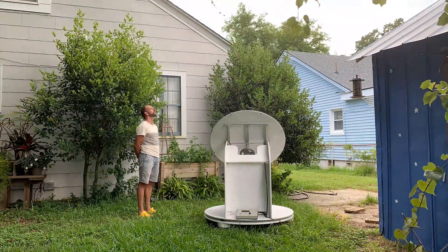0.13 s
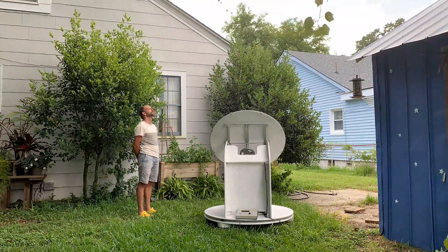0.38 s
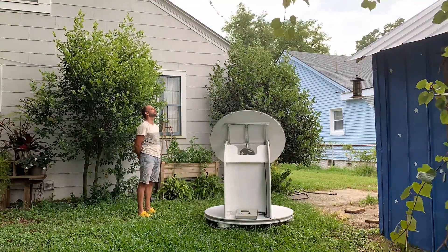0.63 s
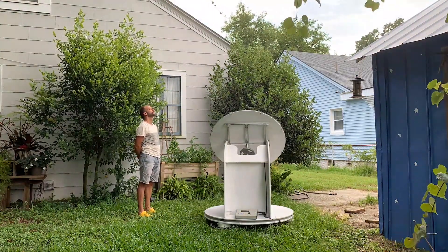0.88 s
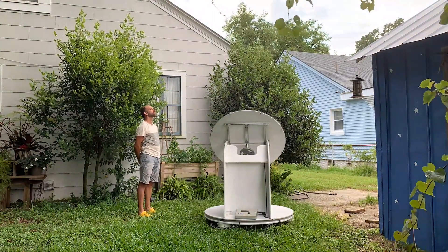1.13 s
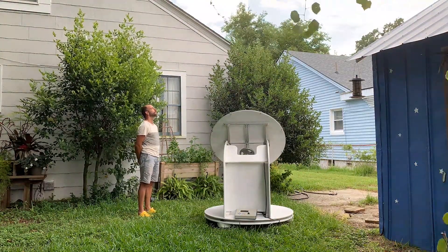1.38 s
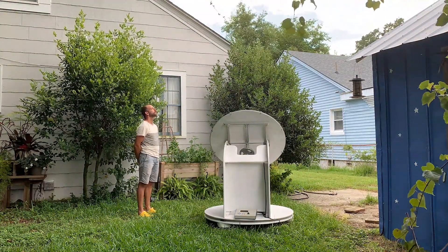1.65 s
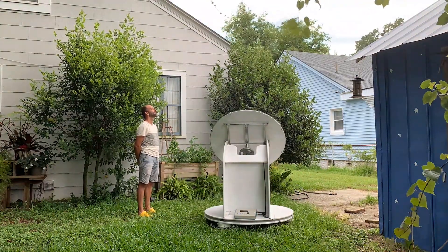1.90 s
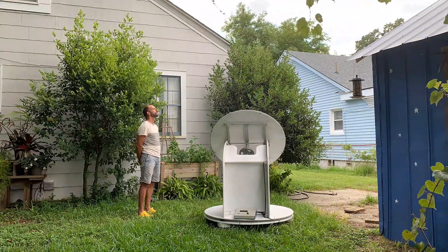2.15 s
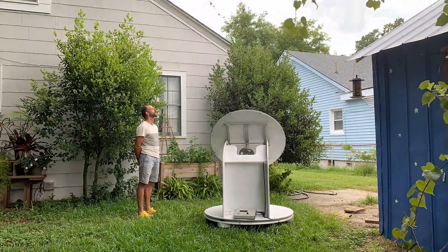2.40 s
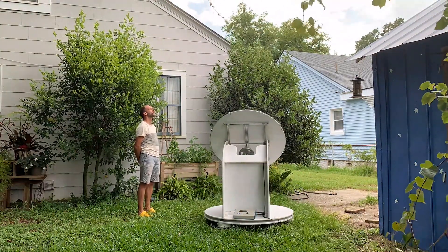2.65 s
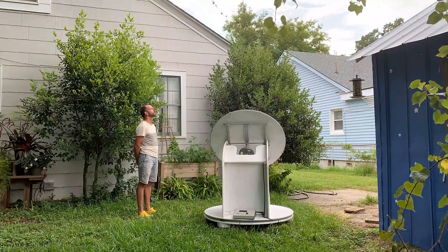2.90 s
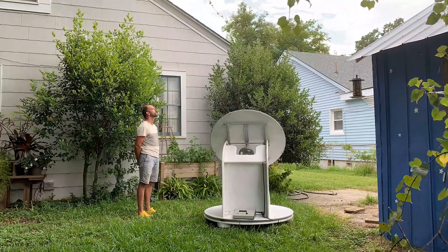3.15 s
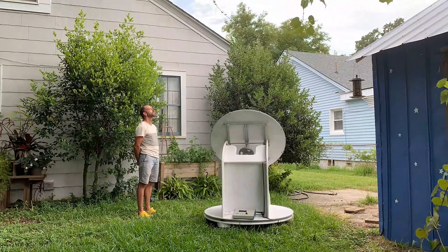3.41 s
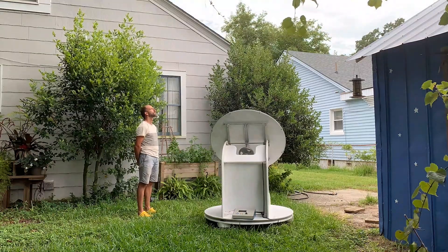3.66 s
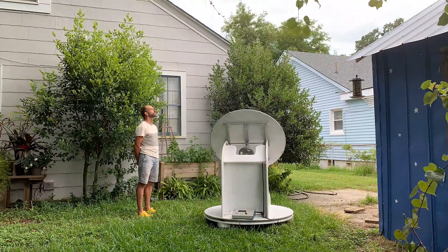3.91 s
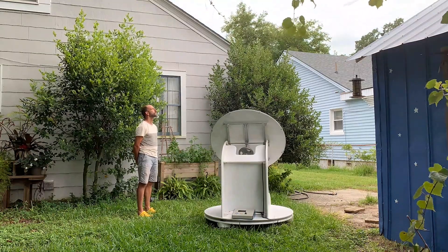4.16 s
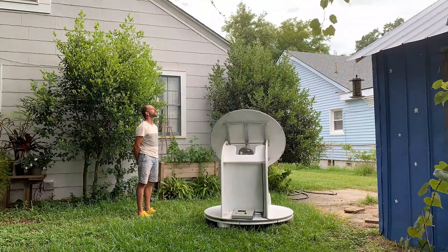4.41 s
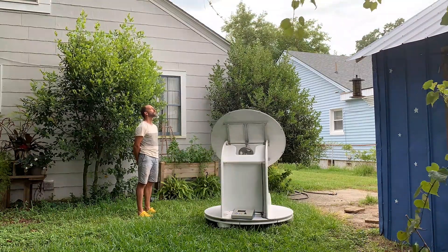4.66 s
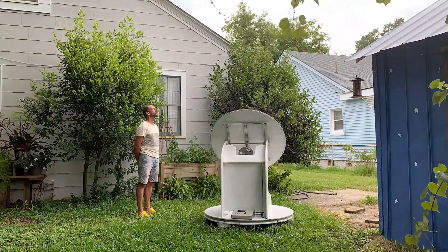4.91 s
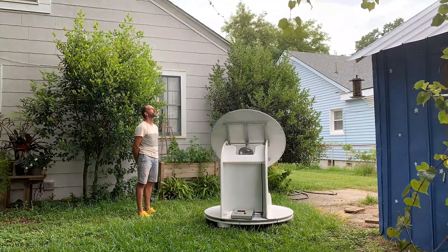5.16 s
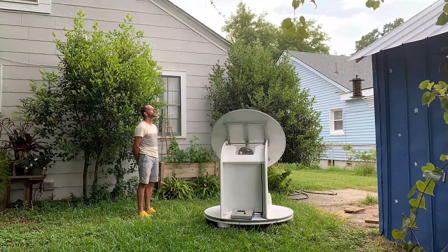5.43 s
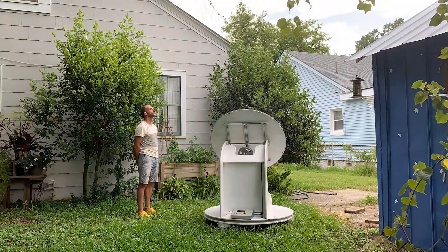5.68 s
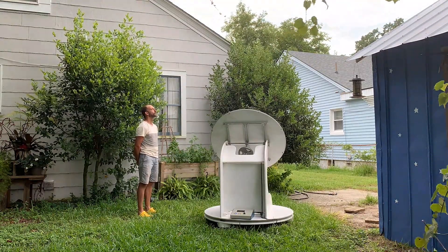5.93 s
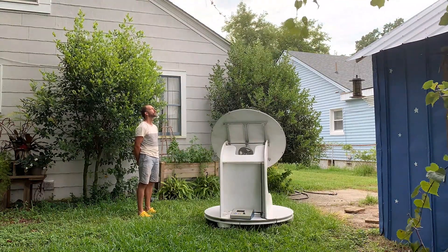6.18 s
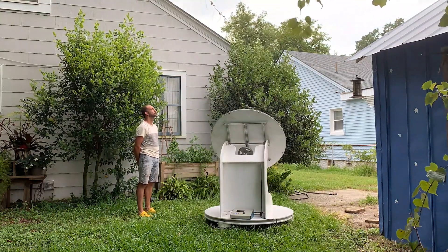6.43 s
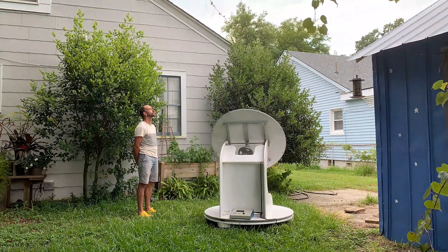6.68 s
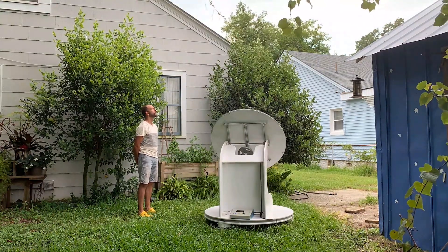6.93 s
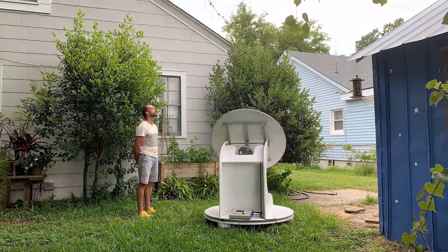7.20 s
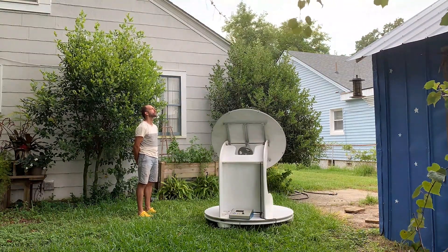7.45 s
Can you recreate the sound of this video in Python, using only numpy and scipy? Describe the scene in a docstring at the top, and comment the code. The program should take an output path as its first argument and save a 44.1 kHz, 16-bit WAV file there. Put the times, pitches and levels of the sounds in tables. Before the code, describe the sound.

Thin, piercing cricket song flutters over a quiet, low-heavy bed of mains hum, motors and far town noise. Wind bumps the open-air microphone during the first two seconds, with faint leaf rustle and a cluster of crisp ticks around one and a half seconds. Afterwards it is calmer, with only stray ticks, and the crickets grow slightly stronger. A tiny gap of silence comes just before the end, then a soft low swell. Mono.

```python
"""Ground crickets in a back garden

Two bands of crickets throb about five times a second, drifting in and out of step: sagging tones, one per wing stroke.
Compressors hum as wavering sines over the even roar of town and a faint hiss, both shaped noise.
A breeze lifts hiss and leaf rustle, ticks leaves as short noise bursts and buffets the microphone with low noise.
The sound drops out once, briefly; a swell of low noise closes the scene."""
import sys
import numpy as np
from scipy import signal
from scipy.fft import rfft, irfft, next_fast_len
from scipy.io import wavfile
from scipy.ndimage import uniform_filter1d

SR = 44100
rng = np.random.default_rng(int(sys.argv[2]) if len(sys.argv) > 2 else 0)


def master(y):
    """Save y as 16-bit WAV."""
    cut = np.clip(np.atleast_2d(y).T, -1, 1)
    pcm = np.round(cut * 32767)  # scale
    wavfile.write(sys.argv[1], SR, pcm.astype(np.int16))


def volts(x):
    """Linear amplitude factor 10**(x/20) for a level x in dB, scalar or array-like."""
    e = np.asarray(x, float) / 20
    return 10 ** e


N = 333837
LONG = next_fast_len(N)
T = np.arange(N) / SR


def curve(table):
    """Joins (time [s], value) points by straight lines."""
    return np.interp(T, *np.transpose(table))


def unit(x):
    """Scales a signal to rms 1."""
    return x / np.sqrt(np.mean(x ** 2))


def walk(rate):
    """Random levels, rate a second, joined smoothly; their spread is near 1."""
    hold = int(SR / rate)
    levels = rng.standard_normal(N // hold + 3)
    joined = np.interp(T * rate, np.arange(len(levels)), levels)
    return 1.2 * uniform_filter1d(joined, hold // 2)


def swells(times, peaks_db, lengths):
    """Summed power of raised-cosine swells, each as long as its length [s] from foot to foot."""
    power = np.zeros(N)
    for time, db, length in zip(times, peaks_db, lengths):
        first = max(int((time - length / 2) * SR), 0)
        span = slice(first, int((time + length / 2) * SR))
        power[span] += volts(db) ** 2 * np.cos(np.pi * (T[span] - time) / length) ** 2
    return power


def airy(colour, swell_db, flicker_db):
    """Coloured noise in half-octave bands that swell together and flicker each on its own."""
    octave = np.log2(np.arange(1, LONG // 2 + 2) * SR / LONG)
    hz, db = np.transpose(colour)
    density_db = np.interp(octave, np.log2(hz), db, left=-200, right=-200)
    gain = volts(density_db) * np.sqrt(SR / 2)  # from level per Hz to white noise gain
    noise = gain * rfft(rng.standard_normal(LONG))
    swell, out = walk(3.05), 0
    for centre in np.arange(np.floor(np.log2(hz[0])), np.log2(hz[-1]) + .5, .5):
        share = np.cos(np.pi * np.clip(octave - centre, -.5, .5)) ** 2
        band = irfft(noise * share, LONG)[:N]
        out = out + volts(swell_db * swell + flicker_db * walk(12)) * band
    return out


STROKES_PER_S, STROKE_SPREAD = 52, .08  # middle rate; spread between crickets, as a fraction of it
STROKE_SHARE, STROKE_SCATTER_DB = .75, 2.2  # sounding part of each stroke cycle; level spread


def group(hz, spread_hz, fall_hz, count=10):
    """Each cricket closes its wings at its own rate; every stroke is a short tone that sags in pitch."""
    tone, overtone = 0, 0
    for pace, start in rng.standard_normal((count, 2)):
        rate = STROKES_PER_S * (1 + STROKE_SPREAD * pace)
        strokes = T * rate + 10 * abs(start) + walk(5)  # running count, wandering in time
        part, stroke = strokes % 1 / STROKE_SHARE, strokes.astype(int)
        size, pitch = rng.standard_normal((N // 100, 2)).T
        swing = volts(STROKE_SCATTER_DB * size)[stroke] * np.sin(np.pi * np.minimum(part, 1)) ** 2
        wing_hz = hz + spread_hz * pitch[stroke] + fall_hz * (.5 - part)
        wing = np.sin(2 * np.pi * np.cumsum(wing_hz) / SR)
        tone = tone + swing * wing
        overtone = overtone + swing * (1 - 2 * wing ** 2)  # the octave above
    return unit(tone), unit(overtone)


# groups of crickets: (part of the song, wing pitch [Hz], pitch spread [Hz], fall during a stroke [Hz],
# relative level [dB], relative share of the overtone [dB])
CRICKET_GROUPS = [("lower", 7320, 79, 298, -0.5, 0), ("lower", 7080, 99, 347, -8.5, -8),
                  ("lower", 6720, 170, 400, -21.5, -14), ("higher", 7540, 45, 199, 1, -4),
                  ("higher", 7834, 60, 200, -15.5, -11)]
# swells of the far band: (time [s], peak level before the part's own gain [dB])
FAR_BAND = [(0.0, -60.4), (0.2, -54.4), (0.41, -55.5), (0.64, -57.5), (0.81, -57.6), (1.04, -61.1),
            (1.28, -57.4), (1.52, -60.4), (1.74, -55.1), (1.97, -54.8), (2.22, -56.3), (2.47, -58.1),
            (2.71, -57.4), (2.94, -58.3), (3.15, -56.9), (3.37, -56.6), (3.61, -56.8), (3.79, -56.0),
            (3.93, -56.5), (4.14, -54.2), (4.37, -55.3), (4.59, -55.0), (4.81, -54.6), (5.01, -54.4),
            (5.22, -55.3), (5.47, -53.9), (5.69, -55.0), (5.9, -54.7), (6.12, -53.5), (6.3, -54.7),
            (6.51, -54.0), (6.72, -55.5), (6.93, -55.0), (7.14, -54.6), (7.4, -57.9), (7.62, -56.6)]
# swells of the near band: (time [s], peak level before the part's own gain [dB])
NEAR_BAND = [(0.13, -59.6), (0.32, -62.2), (0.58, -56.3), (0.89, -58.9), (1.08, -58.8), (1.3, -58.2),
             (1.48, -57.2), (1.61, -61.9), (1.84, -60.3), (2.11, -56.9), (2.36, -55.0), (2.59, -55.8),
             (2.82, -55.2), (3.06, -54.6), (3.29, -55.3), (3.52, -56.9), (3.75, -57.8), (4.01, -56.3),
             (4.24, -57.8), (4.35, -60.4), (4.54, -58.3), (4.79, -59.4), (5.06, -61.1), (5.27, -56.9),
             (5.42, -61.2), (5.6, -59.3), (5.87, -59.2), (6.11, -59.5), (6.35, -57.0), (6.55, -58.4),
             (6.76, -57.2), (7.01, -57.8), (7.22, -56.5), (7.33, -57.8), (7.57, -57.1)]
# what each part of the song takes: (gain on far swells [dB], gain on near swells [dB],
# mid-scene level of crickets that never pause [dB])
SONG_PARTS = {"lower": (0.5, 0.5, -61), "higher": (-0.4, -1.4, -63), "overtone": (-25.5, -21.5, -89)}
SWELL_S, STEADY_RISE_DB_PER_S = .2, .45


def crickets():
    """All groups ride the swells of both bands over a slowly growing steady song; overtones carry best from near."""
    far, near = (swells(*np.transpose(band), [SWELL_S] * len(band)) for band in (FAR_BAND, NEAR_BAND))
    rise_db = STEADY_RISE_DB_PER_S * (T - T.mean())
    gain = {}
    for part, (far_db, near_db, steady_db) in SONG_PARTS.items():
        steady = volts(steady_db + rise_db) ** 2
        gain[part] = np.sqrt(volts(far_db) ** 2 * far + volts(near_db) ** 2 * near + steady)
    tones, overtones = 0, 0
    for part, hz, spread_hz, fall_hz, db, overtone_db in CRICKET_GROUPS:
        tone, overtone = group(hz, spread_hz, fall_hz)
        tones = tones + volts(db) * gain[part] * tone
        overtones = overtones + volts(overtone_db) * overtone
    return tones + gain["overtone"] * unit(overtones)


# compressor and mains tones: (pitch [Hz], rms level [dB], waver [dB])
HUM_TONES = [(53.35, -50.5, 1.1), (57.16, -53, 1.1), (59.25, -49.5, .8), (106.3, -52.5, .8),
             (108.1, -61.5, 1.5), (120, -53.5, .8), (161.1, -59.5, 2.5), (212.5, -56.5, 1.5),
             (295.8, -69, 1.5), (350.4, -72.5, 1.5)]


def compressors():
    """Steady tones from motors and mains, whose levels waver slowly."""
    hum = 0
    for hz, db, waver_db in HUM_TONES:
        level = np.sqrt(2) * volts(db + waver_db * walk(2.48))
        hum = hum + level * np.sin(2 * np.pi * (hz * T + rng.random()))
    return hum


# colour of fans and traffic: (frequency [Hz], level per Hz [dB])
TOWN_COLOUR = [(24, -76), (68, -69), (88, -69), (110, -67), (142, -72), (174, -67), (187, -75), (250, -76),
               (300, -81), (480, -85), (1050, -86), (1600, -93), (2100, -99), (2900, -102), (4200, -108),
               (6000, -112), (8100, -116), (8300, -128)]


def town():
    """Fans and traffic blend into an even, mostly low roar of noise."""
    return airy(TOWN_COLOUR, swell_db=-0.27, flicker_db=0.8)


# strength of the breeze in the leaves: (time [s], level [dB])
BREEZE_LEVEL = [(0, -2.5), (1.2, 1.5), (1.5, 2), (2, 1), (3.4, 0.5), (4.5, -1), (5.5, -2), (6.5, -2),
                (7.57, -1.5)]


def breeze():
    """The rise and fall in dB that moves both hiss and rustle."""
    return curve(BREEZE_LEVEL)


# colour of the faint high hiss: (frequency [Hz], level per Hz before the breeze [dB])
HISS_COLOUR = [(8300, -130), (9600, -123), (9800, -115), (10450, -110), (10700, -114.5), (13000, -115.5),
               (14300, -116), (15300, -121), (15700, -128)]


def hiss():
    """High noise that follows the breeze."""
    return volts(breeze()) * airy(HISS_COLOUR, swell_db=.8, flicker_db=1.2)


# colour of the rustling leaves: (frequency [Hz], level per Hz before trim and breeze [dB])
RUSTLE_COLOUR = [(1500, -118), (2700, -108), (4500, -118)]
RUSTLE_TRIM_DB, RUSTLE_FOLLOWS = -1.5, 1.3  # second: dB of rustle per dB of breeze


def rustle():
    """Many leaves brushing blend into noise that swings wider than the breeze, strongest early."""
    level = volts(RUSTLE_TRIM_DB + RUSTLE_FOLLOWS * breeze())
    return level * airy(RUSTLE_COLOUR, swell_db=1.5, flicker_db=2.5)


# steady wind on the microphone: (time [s], level [dB])
STEADY_WIND = [(0, -56), (.6, -51), (2.3, -52), (2.55, -57), (5.1, -57), (7.3, -61)]
# gusts on the microphone, and a swell of low noise at the cut-off end: (time [s], peak level [dB], length [s])
LOW_SWELLS = [(.27, -40, .16), (.43, -43, .14), (.73, -38, .18), (1.07, -42, .18), (1.39, -44, .2),
              (1.72, -40, .2), (2.23, -46, .2), (2.39, -46, .14), (4.03, -49, .14), (5.04, -53, .3),
              (7.57, -46, .3)]
# dull bumps of wind: (time [s], peak level [dB], pitch [Hz], time to fall to 1/e either side [s])
WIND_BUMPS = [(.71, -35, 48, .035), (1.068, -33, 58, .018), (1.72, -38, 57, .06)]


def wind_and_last_swell():
    """Wind buffets the microphone as low noise with dull bumps, strongest early; the same noise swells at the end."""
    colour = [(14, -21), (24, -2), (40, -1), (62, -2), (80, -21)]  # (frequency [Hz], relative level [dB])
    low_noise = unit(airy(colour, swell_db=-2.0, flicker_db=2.0))
    strength = np.sqrt(volts(curve(STEADY_WIND)) ** 2 + swells(*np.transpose(LOW_SWELLS)))
    bumps = 0
    for time, db, hz, length in WIND_BUMPS:
        shape = np.exp(-((T - time) / length) ** 2)
        bumps = bumps + volts(db) * shape * np.cos(2 * np.pi * hz * (T - time))
    return strength * low_noise + bumps


# leaf ticks: (time [s], peak level [dB], centre [Hz], width [Hz])
LEAF_TICKS = [(1.385, -62, 11000, 3500), (1.4422, -56, 2500, 2600), (1.4741, -57, 12300, 6000),
              (1.4941, -54, 11800, 6000), (1.509, -60, 13000, 4500), (1.515, -59, 11800, 1500),
              (1.5914, -48, 4000, 3600), (1.691, -53, 3500, 3000), (1.7046, -51, 10500, 5000),
              (2.6734, -64, 11800, 3000), (2.7473, -51, 3500, 2800), (3.3318, -64, 12500, 5000),
              (3.373, -56, 7000, 9000), (4.7432, -64, 12000, 4000), (5.9053, -60, 12500, 5000)]
TICK_DECAY_S = 0.001


def leaf_ticks():
    """Each tick is a brief dying burst of noise, filtered to a band around its own pitch."""
    out, size = np.zeros(N + SR), 512  # size in samples
    bursts = rng.standard_normal((len(LEAF_TICKS), size)) * np.exp(-T[:size] / TICK_DECAY_S)
    for (time, db, hz, width_hz), burst in zip(LEAF_TICKS, bursts):
        edges = [hz - width_hz / 2, hz + width_hz / 2]
        tick = signal.sosfilt(signal.butter(3, edges, "band", fs=SR, output="sos"), burst)
        out[int(time * SR):][:size] += volts(db) * tick / np.abs(tick).max()
    return out[:N]


def scene():
    """The garden: crickets, hum and town under a light breeze, in one channel."""
    steady = compressors() + town()
    moving_air = hiss() + rustle() + wind_and_last_swell() + leaf_ticks()
    return (crickets() + steady + moving_air)[None]


def band_limit(x):
    """A steep low-pass at the top of the band."""
    return signal.sosfilt(signal.butter(12, 16550, fs=SR, output="sos"), x)


# the dropout: (start [s], end [s])
DROPOUT = (7.2568, 7.2793)
TOP_HZ, EDGE_S = 15700, .0008


def record(dry):
    """A steep filter cuts the top; the sound drops out for a moment, with edges under a millisecond long."""
    dull = signal.sosfilt(signal.ellip(10, .2, 60, TOP_HZ, fs=SR, output="sos"), dry)
    outside_s = np.maximum(DROPOUT[0] - T, T - DROPOUT[1])  # time away from the dropout
    mix = dull * np.clip(outside_s / EDGE_S, 0, 1)
    return band_limit(mix)


dry = scene()
out = record(dry)
master(out)
```